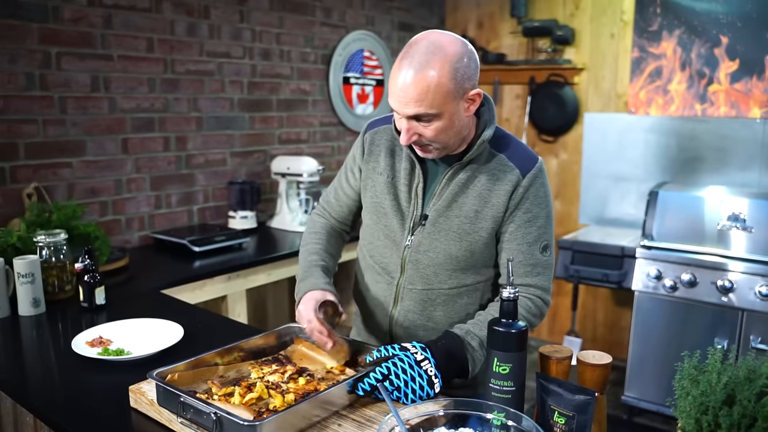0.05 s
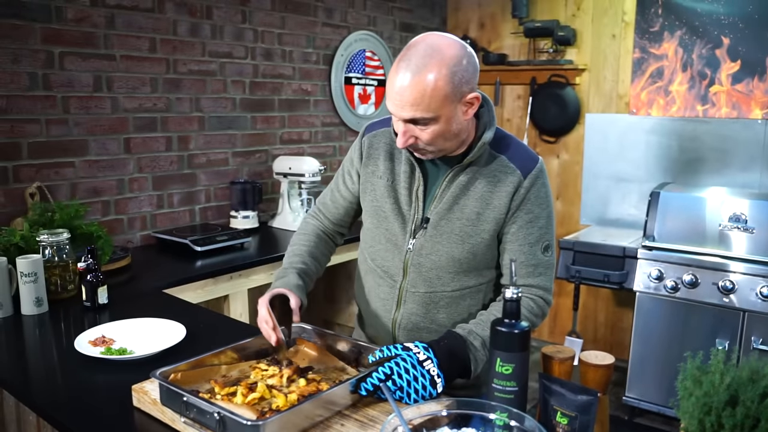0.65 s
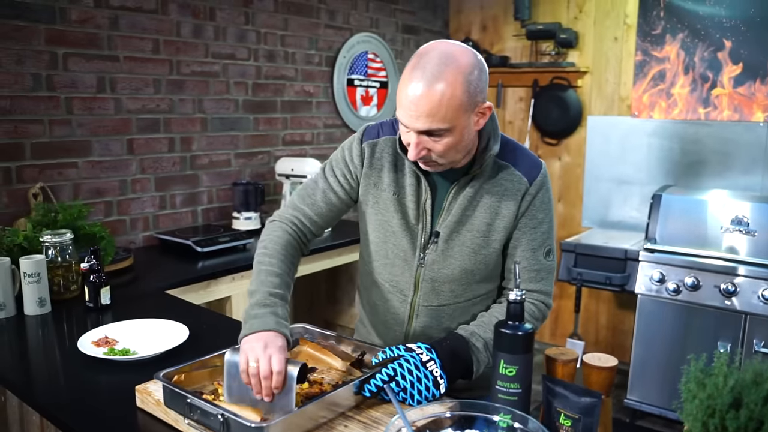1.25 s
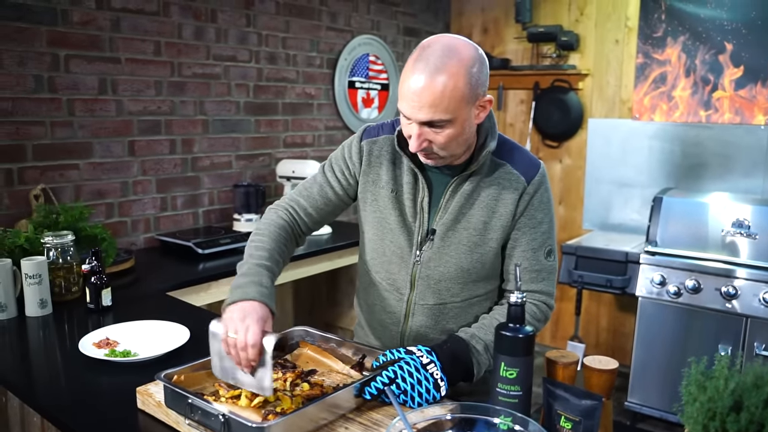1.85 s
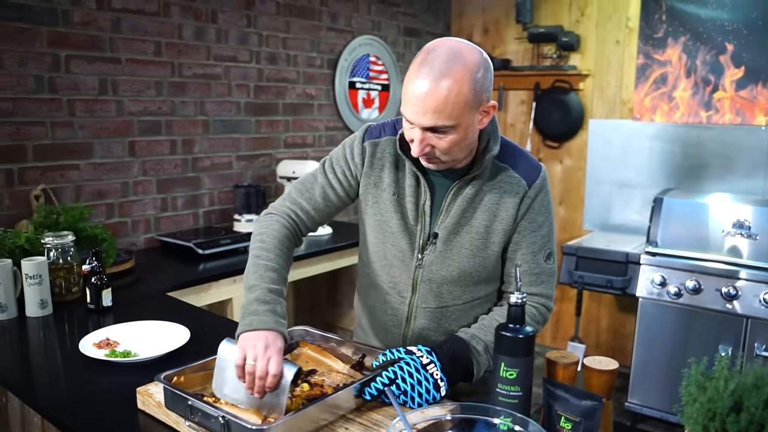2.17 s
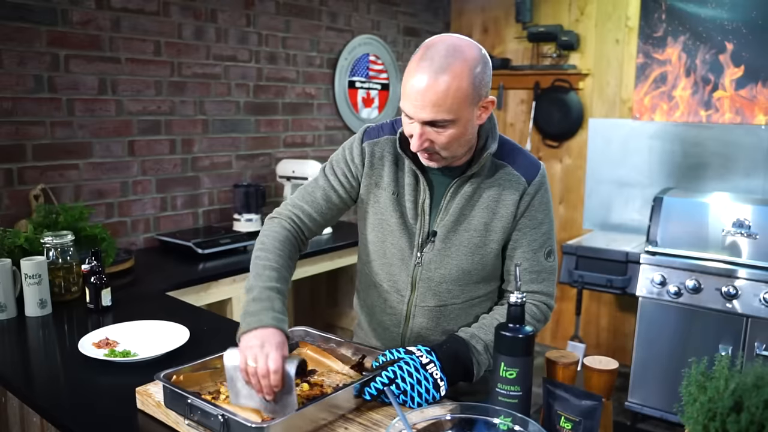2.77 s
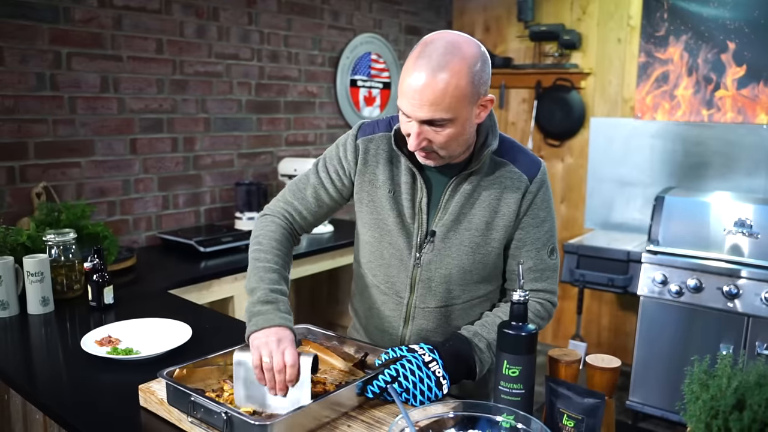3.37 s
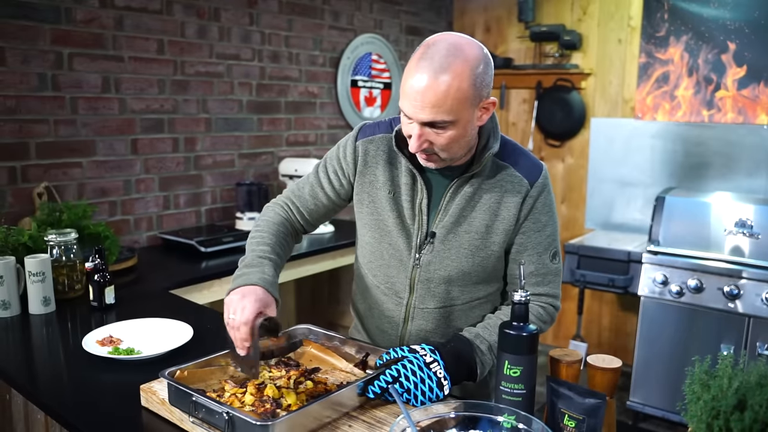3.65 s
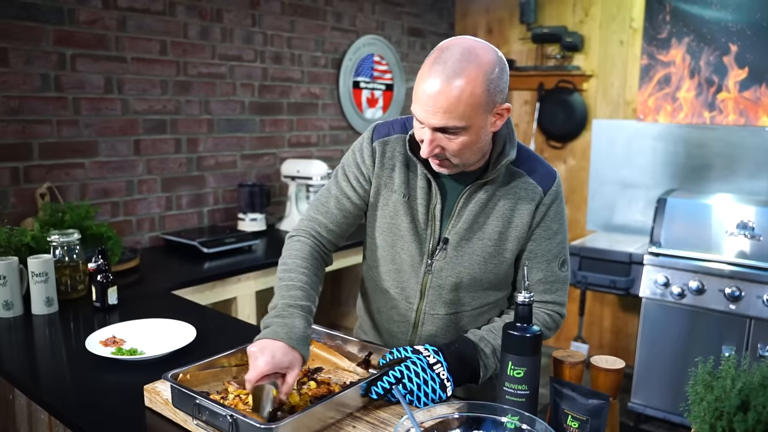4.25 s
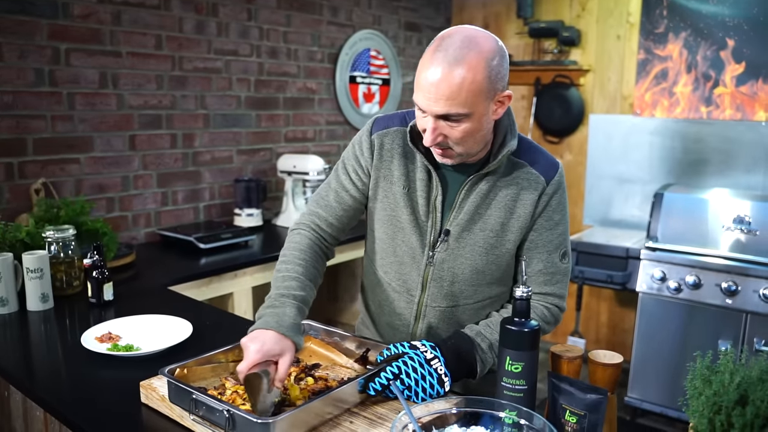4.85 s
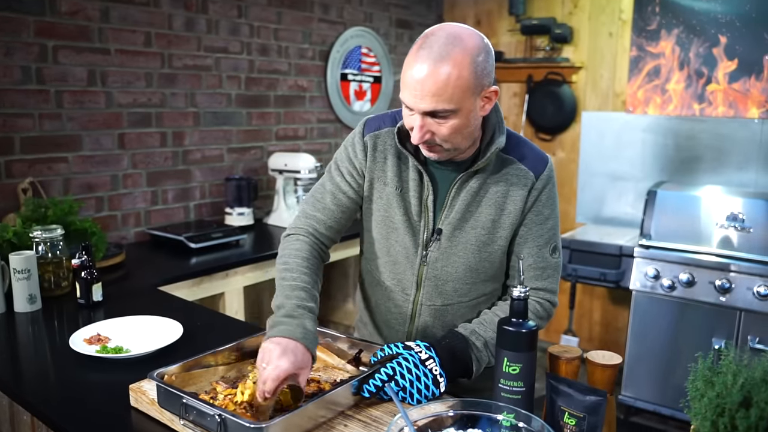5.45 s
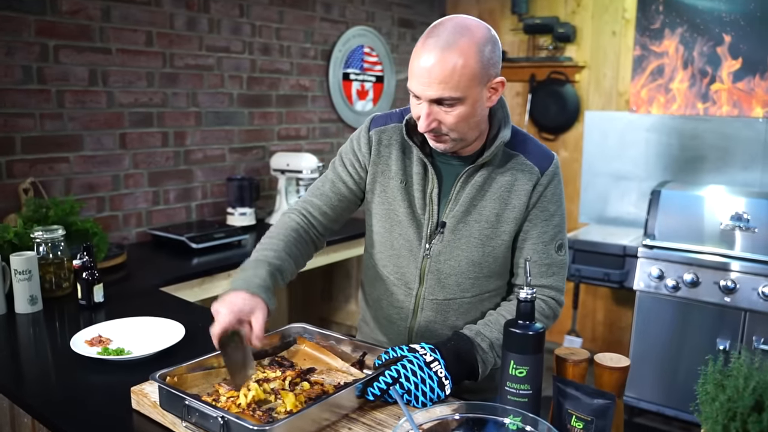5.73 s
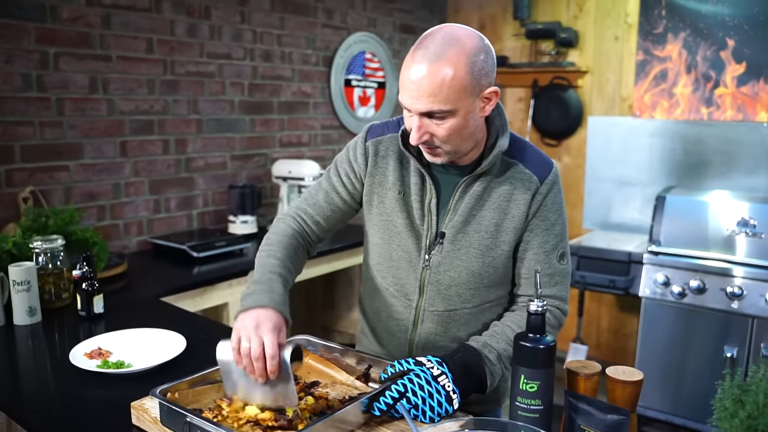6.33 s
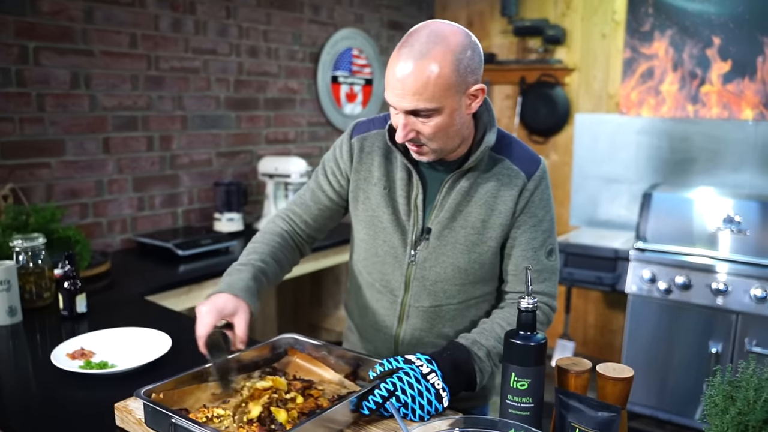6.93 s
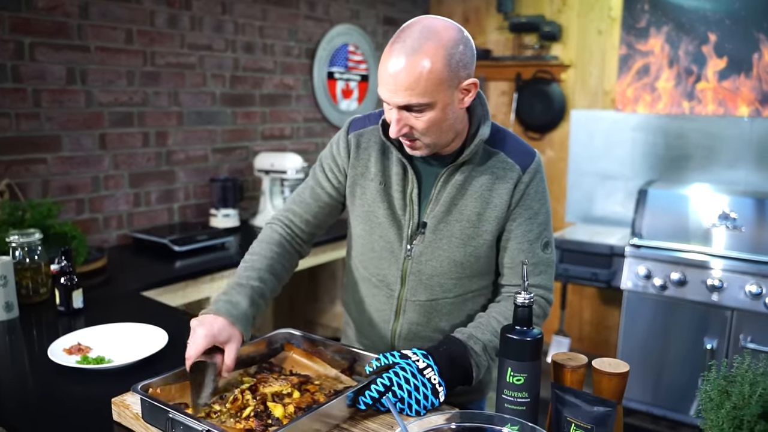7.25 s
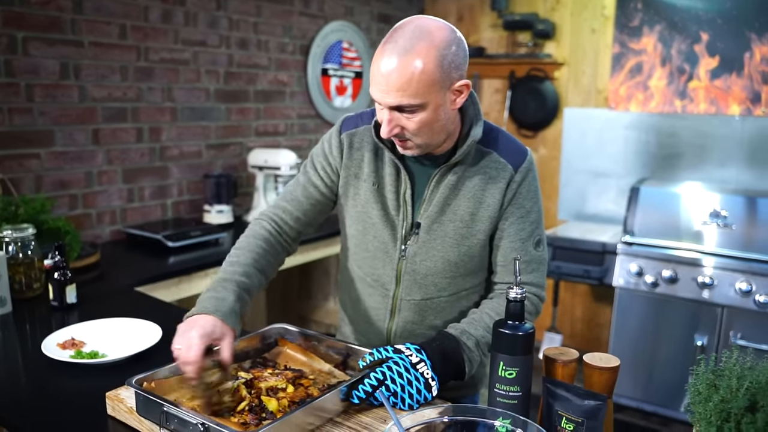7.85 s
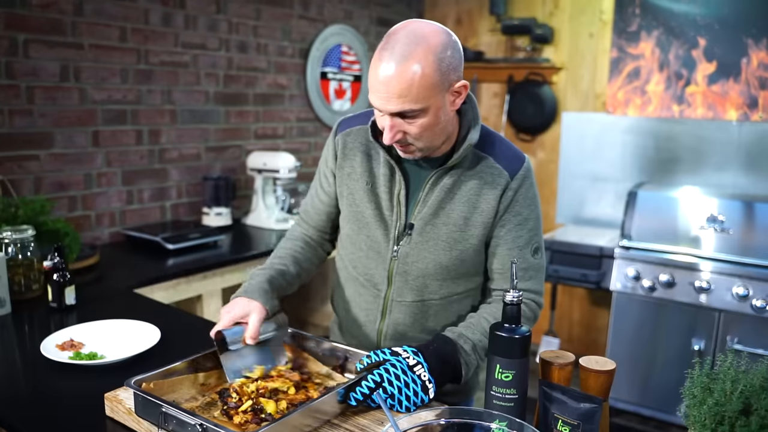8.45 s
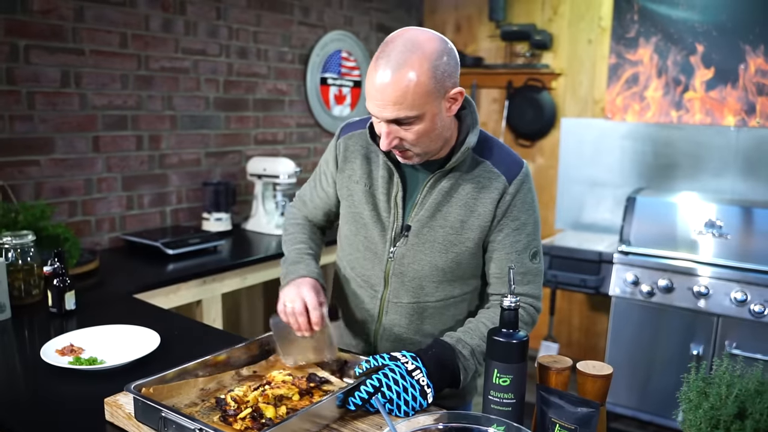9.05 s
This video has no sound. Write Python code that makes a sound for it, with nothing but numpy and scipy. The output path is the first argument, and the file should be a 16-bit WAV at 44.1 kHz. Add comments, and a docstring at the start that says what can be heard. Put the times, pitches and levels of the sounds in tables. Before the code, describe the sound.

A steel scraper works through crisp roasted potatoes in a metal roasting pan, heard close up in a quiet, fairly dry kitchen. It opens with a short scrape and sharp crust snaps. Brief clanks, damped by the food, land at about 0.7, 1.3 and 2.1 seconds and cluster around 3 seconds, with gritty shoves along the bottom between them. Loud crunching follows from 3.3 to 3.7 seconds, then a quick group of clanks just after 4. From 4.3 to 5.7 seconds the blade drags through the pile, grinding softly while crusts crackle and break. Lighter scrapes and snaps continue until about 7 seconds. Stronger chops return near 7.3, 7.8 and 8.4 seconds, ending in light taps just before 9. Now and then the pan rocks on its wooden board with a faint, low knock.

```python
"""Chopping roast potatoes in a pan

A steel spatula chops and scrapes through crisp potatoes in a steel roasting pan on a wooden board.
Each chop clanks the pan, damped by the food; between chops the blade grinds along the bottom,
crusts crackle and snap, and the pan bumps its board. Close microphone, quiet and fairly dry kitchen."""
import sys
import numpy as np
from scipy import signal
from scipy.fft import rfft, irfft, next_fast_len
from scipy.io import wavfile
from scipy.ndimage import uniform_filter1d, map_coordinates

SR = 44100
rng = np.random.default_rng(int(sys.argv[2]) if len(sys.argv) > 2 else 0)


def log_audio(samples):
    """Write samples as a 16-bit WAV file to the path given in sys.argv[1]."""
    # one column per channel
    frames = np.atleast_2d(samples).T
    # limit to full scale, then quantise
    limited = np.clip(frames, -1, 1)
    pcm = np.round(limited * 32767).astype(np.int16)
    wavfile.write(sys.argv[1], SR, pcm)


N = 405279


# Blade blows: start_s, level_db, thump_db, knock_db, edge_db, crust_db, spot_hz, damped_t60_s
# thump_db to crust_db are relative to the clang
CHOPS = [(0.65, -20.5, -13.5, -11.5, -9.5, -8.5, 1199, 0.15),
         (0.959, -49.5, -17, -16.5, -8, -9, 1450, 0.061),
         (1.277, -14.8, -15, -10.5, -10.5, -10, 1980, 0.13),
         (1.326, -17, -10.5, -13, -6, -13.5, 1730, 0.15), (1.632, -38, -8.5, -12, -7.5, -4.5, 1856, 0.09),
         (2.089, -20, -15, -3, -13, -11.5, 954, 0.14), (2.154, -29, -9, -11, -3.5, -5, 2430, .1),
         (2.284, -41, -15, -24, -5, -5.5, 2328, 0.057), (2.888, -30, -13.5, -13.5, -20, -18, 1400, 0.22),
         (2.941, -24.5, -11.5, -9.5, -6, -19, 1080, 0.17), (3.044, -25.5, -6, -8, -1, -8, 600, 0.054),
         (3.062, -18.5, -9, -3, -6, -10.5, 567, .06), (3.191, -31.5, -5.5, -4, -4.5, 1.5, 1030, 0.075),
         (4.081, -24, -12.5, -1.5, -5, -8.5, 1960, .09), (4.13, -34.5, 3, -4.5, 0.5, -10.5, 2075, 0.15),
         (4.179, -20, -21.5, -4, -6, -12, 1380, 0.17), (4.198, -27, -9.5, -7, -4.5, -8.5, 1390, 0.12),
         (6.169, -42.5, -5.5, -4.5, -4, -4.5, 4060, 0.11), (6.907, -32.5, -25.5, -15, -17, -4, 1250, .06),
         (7.259, -25.5, -12, -12.5, -6, -14.5, 1360, .25),
         (7.311, -20.5, -7.5, -7, -9.5, -21.5, 1220, 0.084),
         (7.392, -23.5, -16.5, -34, -5, -8.5, 2100, 0.1), (7.846, -17, -14.5, -6, -4.5, -22, 1300, 0.15),
         (8.433, -20.5, -7, -5, -12.5, -19.5, 1010, 0.066),
         (8.445, -20.5, -7.5, -7.5, -12, -15.5, 1080, 0.11),
         (8.807, -36.5, -19.5, -19, -6.5, -14, 1370, 0.27),
         (8.937, -46.5, -15, -10.5, -5.5, -9, 1720, 0.72)]

def chops():
    """Each blow rings the pan; the food under the blade sets how dull or sharp it is."""
    track, t = np.zeros(N), np.arange(SR // 2) / SR
    bands_hz = [(105, 450), (450, 900), (900, 2300), (2300, 5000), (5000, 16000)]
    contact_s, cushion = 0.0024, 0.75
    for start_s, level_db, thump_db, knock_db, edge_db, crust_db, spot_hz, damped_t60_s in CHOPS:
        ring = pan_ring(spot_hz, damped_t60_s, spot_db=8.5, tail_db=-28.5, tail_t60_s=0.61,
                        modes_db=-10.5, size=len(t))
        thump, knock, clang, edge, crack = [bandpass(ring, *band) for band in bands_hz]
        body = onset_at(thump, thump_db) + onset_at(knock, knock_db) + onset_at(clang, 0)
        bite = onset_at(edge * fade(t, 0.17), edge_db) + onset_at(crack * fade(t, 0.026), crust_db - 2)
        rise_s = contact_s * amp(cushion * crust_db)  # potato under the edge softens the attack
        attack = 1 - np.exp(-t / rise_s)
        add(track, start_s, amp(level_db) * attack * (body + bite))
    return track


# Clear pan modes, longest at the food-free rim: pitch_hz, level_db, t60_s
PAN_MODES = [(305.6, -7.5, 0.22), (372.5, -7, 0.33), (588, -11, 0.12), (762, -5.5, .22), (952, -1, 0.25),
             (990, -1.5, .27), (1090, -6.5, 0.27), (1122, -13, 0.087), (1235, -8.5, 0.14),
             (1388, -2.5, 0.41), (1410, -2.5, 0.21), (1506, -5.5, 0.37), (1680, 2, 0.15),
             (1783, -14.5, 0.6), (1953, -5.5, 0.32), (2015, -1, 0.14), (2050, -11, 0.16), (2370, -21, .2),
             (2710, -7.5, .25), (2854, 1, 0.3), (2910, -1, .25), (3110, -10, .35), (3870, -13, .3),
             (3980, -7.5, .2), (4920, -14, 0.38)]
# Crowded resonances of the steel sheet: freq_hz, density_db
SHEET_SPECTRUM = [(24, -63.5), (40, -24.5), (320, -4), (467, -8), (852, -5), (990, 0), (1150, -1.5),
                  (1850, -3.5), (2000, -7), (2380, -11), (3930, -12.5), (5720, -22.5), (8340, -18.5),
                  (14100, -31.5), (16000, -45.5)]

def pan_ring(spot_hz, damped_t60_s, spot_db, tail_db, tail_t60_s, modes_db, size):
    """The struck spot favours one band; food damps the crowded resonances while clear modes ring on."""
    def spot_gain(hz):
        return amp(spot_db / (1 + ((hz - spot_hz) / (0.054 * spot_hz)) ** 2))

    t = np.arange(size) / SR
    sheet = unit(filtered(noise(SHEET_SPECTRUM, size), spot_gain))
    sheet *= fade(t, damped_t60_s) + amp(tail_db) * fade(t, tail_t60_s)
    pitch_hz, level_db, t60_s = np.transpose(PAN_MODES)
    gains = amp(level_db + 1.6 * rng.standard_normal(len(pitch_hz))) * spot_gain(pitch_hz)
    bent_hz = pitch_hz + 9 * rng.standard_normal(len(pitch_hz))  # blade pressure and shifting load
    phase = rng.random((len(pitch_hz), 1))
    modes = np.sin(2 * np.pi * (np.outer(bent_hz, t) + phase)) * fade(t, t60_s[:, None])
    return sheet + amp(modes_db) * gains @ modes / np.linalg.norm(gains)


# Crust breaks at set times, loud and quiet: start_s, peak_db, pitch_hz, splinters_db
SNAPS = [(0.1431, -19, 2720, -6), (0.166, -16, 3300, -4.5), (0.1695, -12, 3300, -8),
         (0.2723, -19, 2800, -9), (0.818, -38.5, 1800, 4), (1.444, -37, 4000, -1),
         (1.5544, -40.5, 1810, 8.5), (1.6087, -29, 1680, -12.5), (3.3318, -10, 1774, 3.5),
         (3.4184, -15, 1920, -4.5), (3.4436, -13, 1900, -9.5), (3.5204, -14, 1850, -8),
         (3.5943, -24.5, 5910, -11), (3.6721, -22, 2870, -19.5), (3.8332, -40, 6230, -11),
         (3.9, -36.5, 2250, -17.5), (4.6453, -19, 2130, -17.5), (4.789, -28, 3920, -0.5),
         (4.815, -23.5, 3720, -14.5), (4.8833, -23, 2340, -1), (4.9681, -17.5, 4870, -7),
         (4.9987, -23, 6680, -3.5), (5.1437, -24.5, 2010, -13), (5.2974, -22, 2270, -3),
         (5.46, -22.5, 2650, -9), (5.5443, -23.5, 2810, -19), (5.8671, -31.5, 6710, 13.5),
         (5.9778, -35.5, 5470, -12), (6.0412, -20, 4240, -2.5), (6.1913, -20, 4660, -10),
         (6.6242, -41, 4070, -2), (6.7313, -41, 3020, -26), (7.104, -39, 2500, -8.5),
         (7.3592, -17.5, 1990, -3), (7.4924, -26.5, 4000, -7.5), (8.0052, -20, 2050, 5.5),
         (8.6964, -25.5, 1920, -4), (8.8635, -34, 4000, -11.5)]

def snaps(small_breaks):
    """Crust pieces, big and small, break with a sharp crack and a brief trail of splinters."""
    track, t = np.zeros(N), np.arange(SR // 10) / SR
    treble = signal.butter(2, [5500, 14000], 'band', fs=SR, output='sos')
    for start_s, peak_db, pitch_hz, splinters_db in SNAPS + small_breaks:
        burst = rng.standard_normal(len(t)) * (fade(t, 0.018) + amp(-29) * fade(t, 0.087))
        band_hz = np.clip(pitch_hz, 1500, 8000) * np.array([0.5, 1.7])
        body = signal.sosfilt(signal.butter(2, band_hz, 'band', fs=SR, output='sos'), burst)
        crack = body + amp(splinters_db) * signal.sosfilt(treble, burst)
        add(track, start_s, amp(peak_db) * crack / np.abs(crack).max())
    return track


def crumbs(crush):
    """Rows for snaps(): small pieces break at random under the blade and tumble on behind it."""
    rate_per_s, tumble_s, tumble_db, splinters_db = 9, 0.2, -14, -3.5
    pole = np.exp(-1 / (tumble_s * SR))
    tumble = amp(tumble_db) * signal.lfilter([1 - pole], [1, -pole], crush)
    loose_db = 20 * np.log10(np.maximum(crush, tumble) + 1e-9)
    rows = []
    for when, size, pitch in rng.random((300, 3))[:int(rate_per_s * N / SR)]:
        peak_db = loose_db[int(when * N)] + 8.5 + 4 * (2 * size - 1)
        pitch_hz = 2770 * 2 ** (2 * pitch - 1)
        rows.append((when * N / SR, peak_db, pitch_hz, splinters_db))
    return rows


# One long drag through the pile: time_s, crush_db, grind_db
DRAG = [(4.3, -47, -60), (4.354, -63, -53), (4.478, -43.5, -43.5), (4.526, -62, -48), (4.678, -32, -41),
        (4.796, -50.5, -45), (4.82, -45.5, -44), (4.848, -69, -52), (4.892, -46, -46), (5.008, -37.5, -50),
        (5.1, -53.5, -56.5), (5.172, -37.5, -44), (5.248, -56, -51.5), (5.294, -41, -40.5),
        (5.438, -43.5, -47.5), (5.49, -32.5, -37), (5.53, -52.5, -41.5), (5.622, -39.5, -41),
        (5.686, -50, -52), (5.73, -46, -48.5)]
# Shoves along the bottom: start_s, length_s, crush_db, grind_db, swell_db, lift_t60_s
STROKES = [(0.128, 0.16, -45, -42.5, -1.5, 0.26), (0.648, 0.074, -41.5, -37.5, -1.5, 0.38),
           (1.252, .085, -45, -41.5, 1.5, 0.55), (1.621, 0.04, -44.5, -43.5, -9, 0.32),
           (2.082, .2, -48.5, -36.5, -7.5, 0.24), (2.375, .06, -47, -42, 5.5, .3),
           (2.867, 0.19, -45, -43.5, 6, 0.42), (3.154, 0.18, -49.5, -43.5, -2, 0.254),
           (3.329, 0.19, -32.5, -43, -5, 0.41), (3.929, 0.068, -63.5, -59, 11, 0.42),
           (4.053, .18, -42.5, -34, -1.5, 0.45), (6.176, 0.083, -43.5, -45, 17.5, 0.12),
           (6.281, 0.07, -37, -40, 7, 0.15), (6.353, 0.16, -50, -48, -1.5, 0.28),
           (6.752, 0.061, -66, -55.5, 6.5, .3), (6.809, 0.074, -51, -42.5, 7, 0.83),
           (7.257, .14, -41, -42.5, 5, 0.35), (7.846, 0.13, -39.5, -38, 9, 0.31),
           (8.123, 0.052, -52, -43.5, -7, 0.27), (8.356, .045, -44.5, -38.5, 23, 0.19),
           (8.405, .11, -39, -30, 7, 0.22), (8.554, 0.096, -40, -41.5, -6, 0.61)]

def blade_effort():
    """Crush and grind envelopes: strokes bite, swell and lift off; chops and snaps crumble briefly."""
    lift_db_per_s, bite_s, cut_in_s, cut_out_s, shatter_db = 158, 0.007, 0.0035, 0.019, -21.5
    t = np.arange(N) / SR
    time_s, *drag_db = np.transpose(DRAG)
    lifted_db = lift_db_per_s * np.abs(t - np.clip(t, time_s[0], time_s[-1]))
    crush_power, grind_power = [amp(np.interp(t, time_s, db) - lifted_db) ** 2 for db in drag_db]
    age_s = t[:SR]
    for start_s, length_s, crush_db, grind_db, swell_db, lift_t60_s in STROKES:
        bite = np.minimum(age_s / bite_s, 1)
        swell = amp(swell_db * (np.minimum(age_s / length_s, 1) - 0.5))
        stroke = bite * swell * fade(np.maximum(age_s - length_s, 0), lift_t60_s)
        add(crush_power, start_s, (amp(crush_db) * stroke) ** 2)
        add(grind_power, start_s, (amp(grind_db) * stroke) ** 2)
    # crust gives way just before a blow and crumbles just after
    offset_s = np.arange(-SR // 10, SR // 10) / SR
    cut = np.exp(-np.maximum(-offset_s / cut_in_s, offset_s / cut_out_s))
    for start_s, level_db, _, _, _, crust_db, _, _ in CHOPS:
        add(crush_power, start_s + offset_s[0], (amp(level_db + crust_db + 1) * cut) ** 2)
    for start_s, peak_db, _, _ in SNAPS:
        add(crush_power, start_s, (amp(peak_db + shatter_db) * fade(age_s, 0.16)) ** 2)
    return np.sqrt(crush_power), np.sqrt(grind_power)


# Light touch, nearly the same rasp, slightly lifted near 2.6 kHz: freq_hz, gain_db
LIGHT_TOUCH = [(300, 1), (900, -0.5), (2600, 2.5), (6000, -1.5)]

def grinding(grind):
    """The edge catches and slips on the baked-on bottom, at ever new spots of the pan."""
    slips, track = ticks(rate_per_s=1300, spread_db=3.5), np.zeros(N)
    hop, hard_push_db = SR // 8, -37
    for start in range(0, N, hop):
        spot_hz = 1750 * np.exp(0.4 * rng.standard_normal())
        ring = pan_ring(spot_hz, damped_t60_s=0.061, spot_db=5.5, tail_db=-29, tail_t60_s=0.25,
                        modes_db=-25, size=SR // 6)
        add(track, start / SR, signal.fftconvolve(slips[start:start + hop], unit(ring)))
    light = evened(coloured(track, LIGHT_TOUCH), span_s=0.13)
    hard = evened(track, span_s=0.075)
    push = grind / (grind + amp(hard_push_db))
    return grind * ((1 - push) * light + push * hard)


# Crumbling crust: freq_hz, density_db
CRUST_SPECTRUM = [(88, -51), (150, -13), (589, -12), (960, -3.5), (1560, -7.5), (1790, -4.5), (2450, -6.5),
                  (2870, -3.5), (5570, -7.5), (8900, -7), (13200, -13), (16000, -18)]

def crunch(crush):
    """Crusts crumble in clusters of tiny fractures while soft flesh smears under the blade."""
    t, fractures = np.arange(SR // 100) / SR, np.zeros(N)
    for _ in range(12):
        onsets = ticks(rate_per_s=150, spread_db=4)
        fracture = unit(rng.standard_normal(len(t)) * fade(t, 0.005))
        fractures += signal.oaconvolve(onsets, fracture)[:N]
    clusters = flicker(rate_per_s=100, spread_db=3.2)
    crackle = evened(coloured(fractures * clusters, CRUST_SPECTRUM), span_s=0.05)
    smear = amp(-8) * noise(CRUST_SPECTRUM, N)
    return crush * (crackle + smear)


# Pan against board: start_s, level_db
BUMPS = [(1.61, -40), (2.115, -36.5), (5.233, -46.5), (6.76, -43), (9.104, -46.5)]

def bumps():
    """The pan rocks on its board with a low, dead knock."""
    track, t = np.zeros(N), np.arange(SR // 5) / SR
    knock = np.sin(2 * np.pi * 165 * t) * fade(t, 0.02) * (1 - fade(t, 0.0047))
    for start_s, level_db in BUMPS:
        add(track, start_s, amp(level_db + 13) * knock)
    return track


# Kitchen decay: freq_hz, t60_s
ROOM_DECAY = [(100, 0.37), (500, 0.3), (2000, 0.14), (6000, 0.23), (14000, 0.042)]

def reverb(x):
    """The kitchen's short tail, duller as it dies."""
    hz, t, spectra = signal.stft(rng.standard_normal(SR // 2), SR, nperseg=256)
    decay = fade(t, along(ROOM_DECAY, hz)[:, None])
    _, tail = signal.istft(spectra * decay, SR, nperseg=256)
    tail = np.pad(tail, (SR // 200, 0))  # 5 ms pre-delay
    return signal.fftconvolve(x, tail / np.linalg.norm(tail))[:N]


# Quiet kitchen: freq_hz, density_db
HUSH_SPECTRUM = [(12, -38), (20, -16), (49, -8), (130, -9.5), (172, -7.5), (198, -12), (248, -8.5),
                 (357, -15.5), (485, -11.5), (759, -15.5), (2500, -23.5), (6000, -28.5), (16000, -30.5)]

def room_hush():
    """Faint, steady noise, strongest in the bass."""
    return amp(-61.5) * noise(HUSH_SPECTRUM, N)


def amp(db):
    """Decibels to gain."""
    return 10 ** (np.asarray(db) / 20)


def unit(x):
    """Scale to rms 1."""
    return x / np.sqrt(np.mean(x ** 2) + 1e-20)


def onset_at(x, level_db):
    """Scale so the first 25 ms have this rms level."""
    return amp(level_db) * x / np.std(x[:SR // 40])


def evened(x, span_s):
    """Hold the rms at 1 over span_s, keeping the faster grain."""
    power = uniform_filter1d(x ** 2, int(span_s * SR))
    return x / np.sqrt(np.abs(power) + 1e-12)


def along(points, hz):
    """Interpolate (freq_hz, value) points on a log axis."""
    freq_hz, values = np.transpose(points)
    return np.interp(np.log(hz + 1), np.log(freq_hz + 1), values)


def filtered(x, response):
    """Apply a zero-phase gain, response(hz)."""
    size = next_fast_len(len(x) + 8192)
    return irfft(rfft(x, size) * response(np.fft.rfftfreq(size, 1 / SR)), size)[:len(x)]


def bandpass(x, low_hz, high_hz):
    """5th-order low cut, 8th-order high cut."""
    return filtered(x, lambda hz: 1 / np.hypot(1, (low_hz / (hz + 1)) ** 5)
                    / np.hypot(1, (hz / high_hz) ** 8))


def coloured(x, spectrum):
    """Filter by (freq_hz, gain_db) points."""
    return filtered(x, lambda hz: amp(along(spectrum, hz)))


def noise(spectrum, size):
    """Coloured noise of rms 1."""
    return unit(coloured(rng.standard_normal(size), spectrum))


def ticks(rate_per_s, spread_db):
    """Random impulses, many small and a few large."""
    size_db = spread_db * np.minimum(rng.exponential(size=N), 4)
    return (rng.random(N) < rate_per_s / SR) * rng.choice([-1, 1], N) * amp(size_db)


def flicker(rate_per_s, spread_db):
    """Smooth random gain."""
    knots = rng.standard_normal(N // 100)
    return amp(spread_db * map_coordinates(knots, [np.arange(N) * rate_per_s / SR]))


def fade(t, t60_s):
    """Decay by 60 dB in t60_s."""
    return np.exp(-np.log(1000) * t / np.maximum(t60_s, 1e-3))


def add(track, start_s, sound):
    """Mix a sound into the track."""
    start = max(round(start_s * SR), 0)
    track[start:start + len(sound)] += sound[:max(N - start, 0)]


def scene():
    """Pan and potatoes close by, over the hush of the room."""
    crush, grind = blade_effort()
    hush = room_hush()
    clumps = flicker(rate_per_s=32, spread_db=2.65)  # crusts give way in clumps
    near = chops() + crunch(crush * clumps) + grinding(grind) + bumps() + snaps(crumbs(crush))
    return (near + amp(-15) * reverb(near) + hush)[None]


def record(dry):
    """Round off the highest peaks, then band-limit."""
    ceiling, top_hz = 0.9, 16100
    rounded = dry / (1 + np.abs(dry / ceiling) ** 6) ** (1 / 6)
    return np.array([filtered(channel, lambda hz: hz < top_hz) for channel in rounded])


dry = scene()
out = record(dry)
log_audio(out)
```